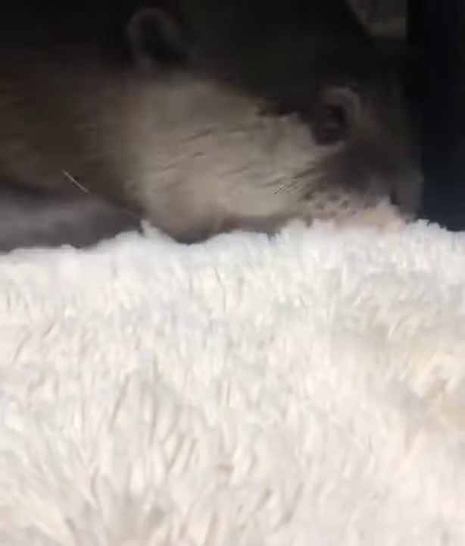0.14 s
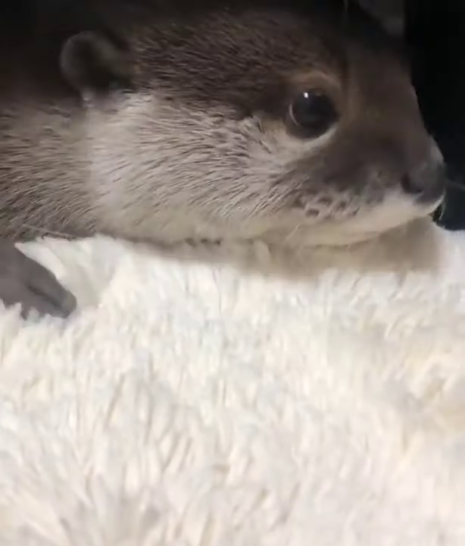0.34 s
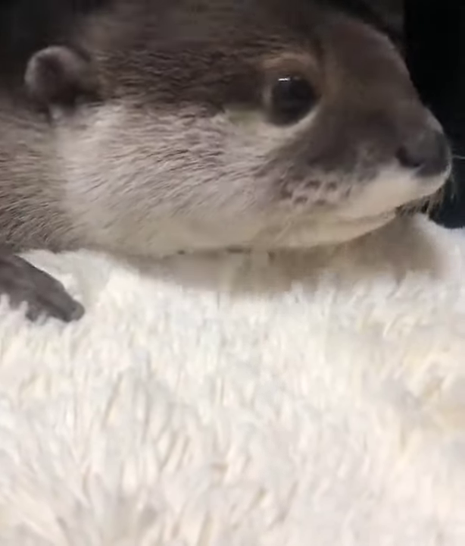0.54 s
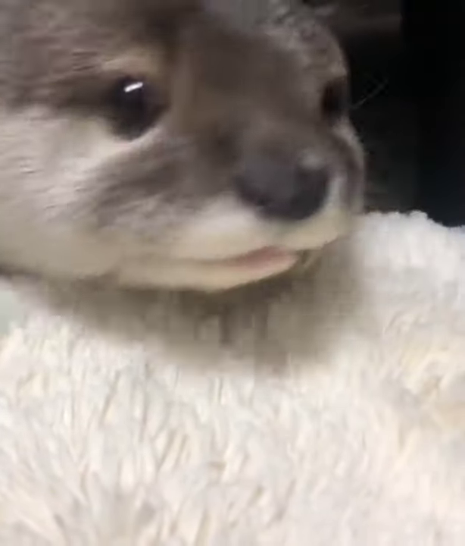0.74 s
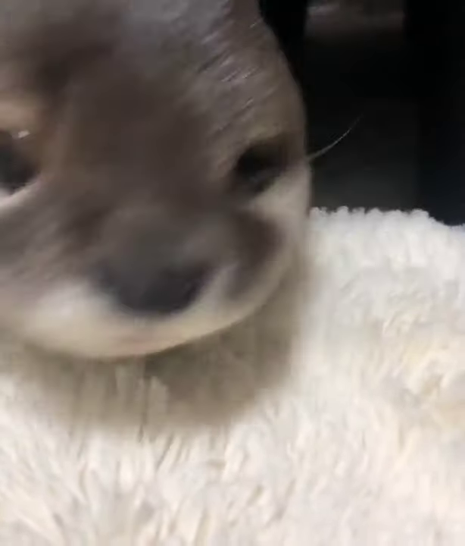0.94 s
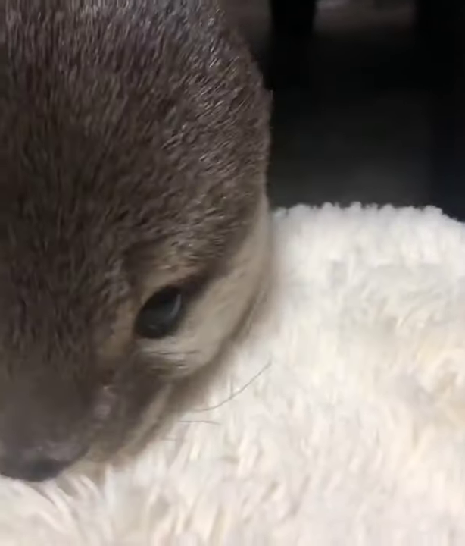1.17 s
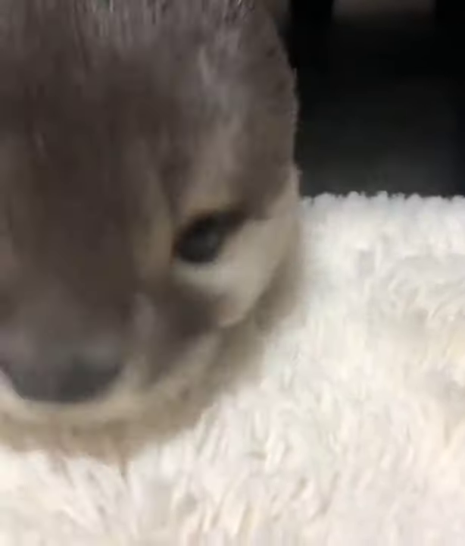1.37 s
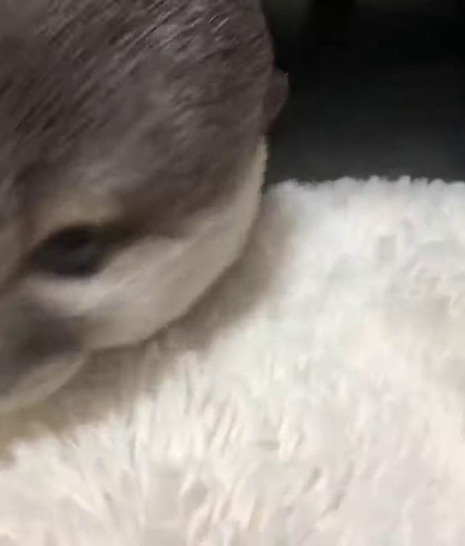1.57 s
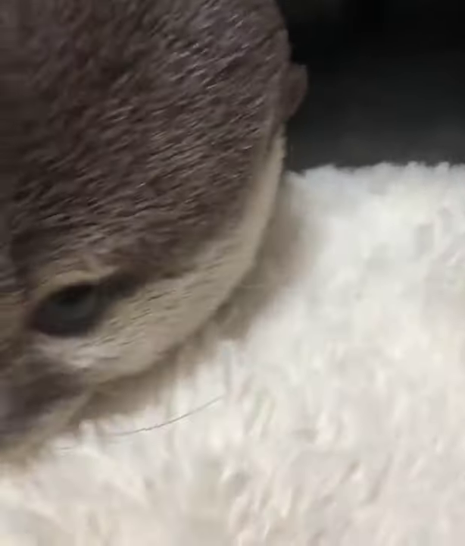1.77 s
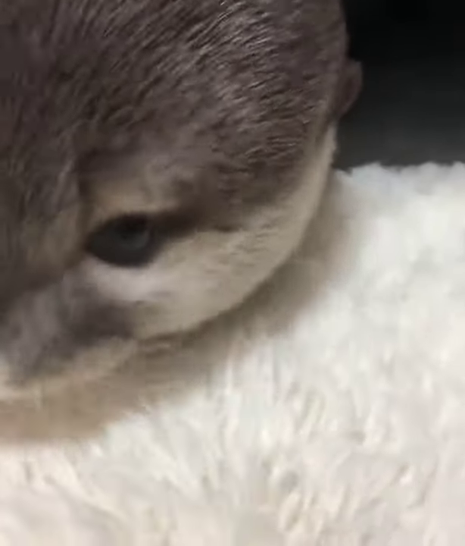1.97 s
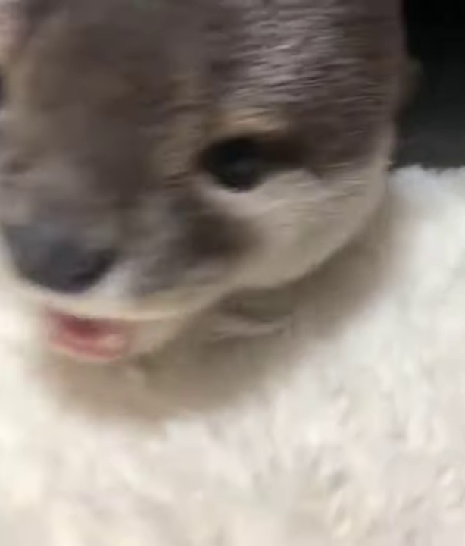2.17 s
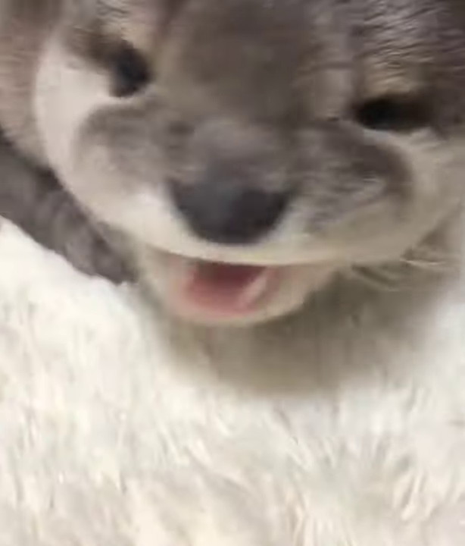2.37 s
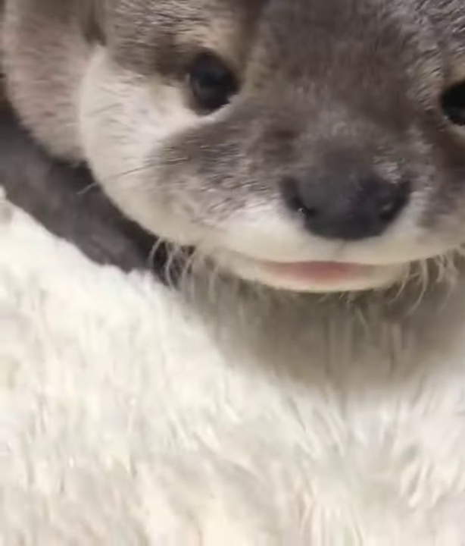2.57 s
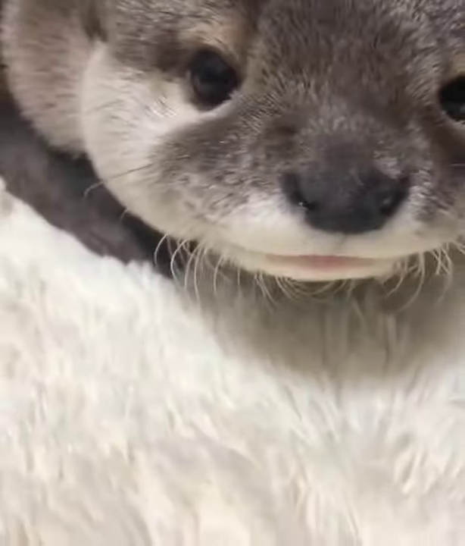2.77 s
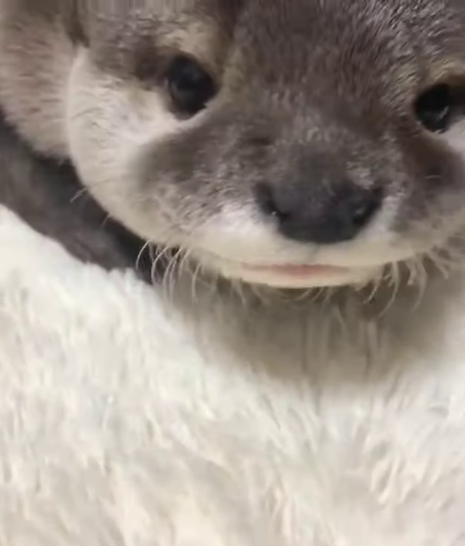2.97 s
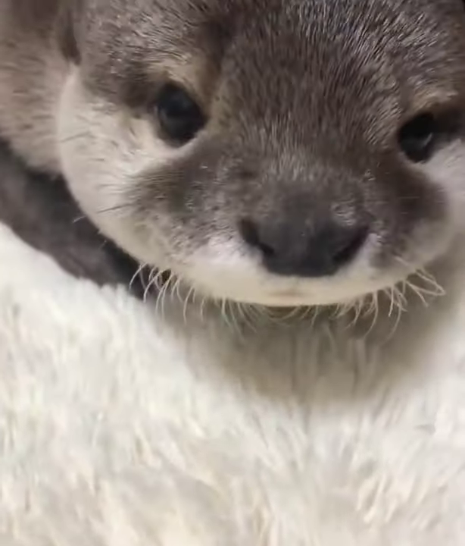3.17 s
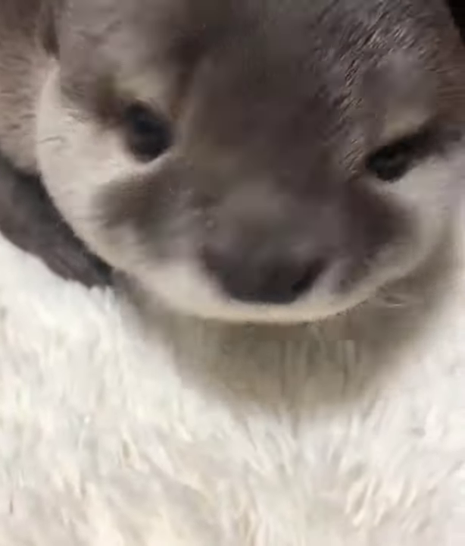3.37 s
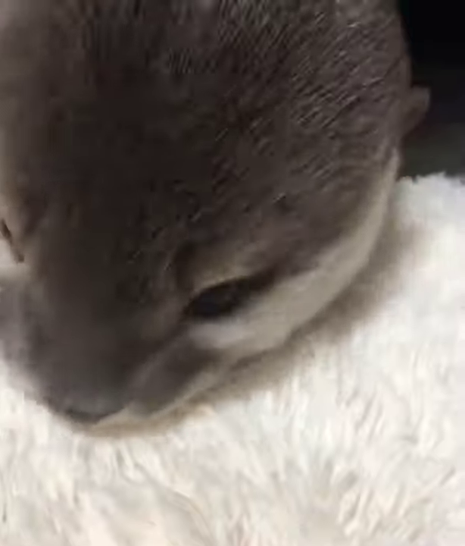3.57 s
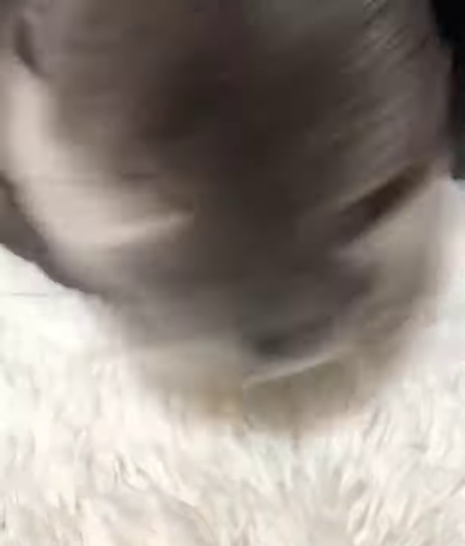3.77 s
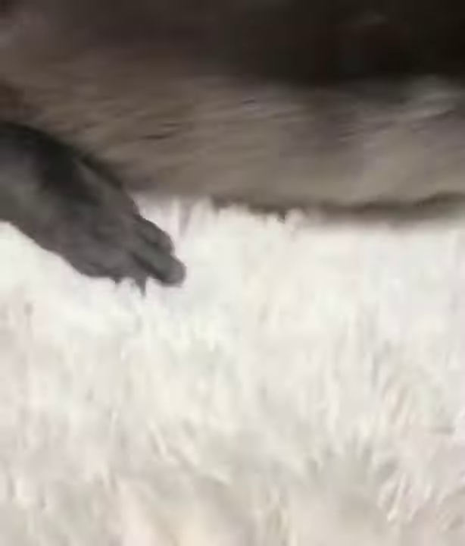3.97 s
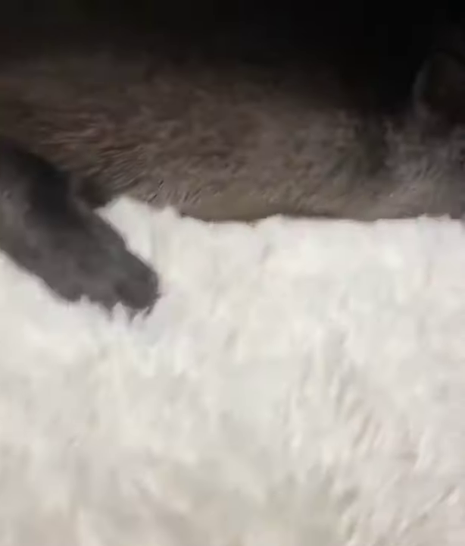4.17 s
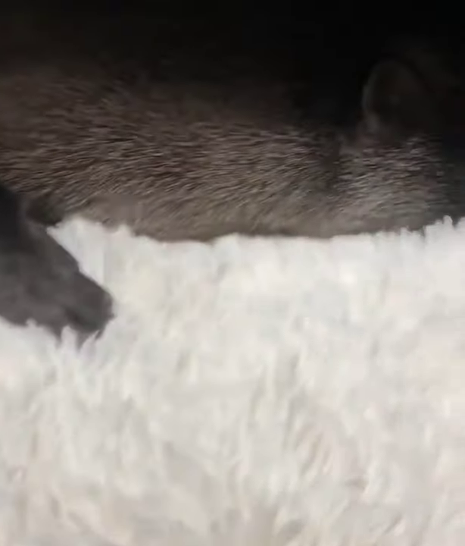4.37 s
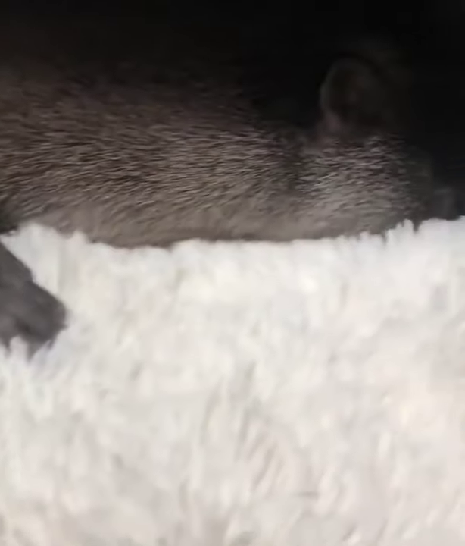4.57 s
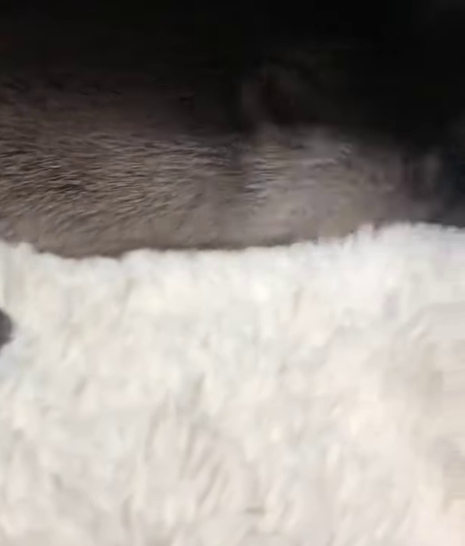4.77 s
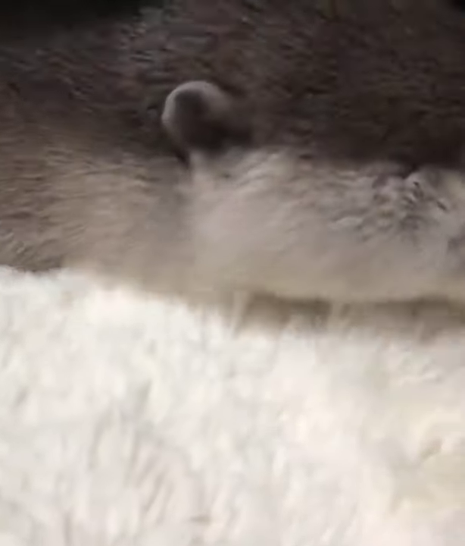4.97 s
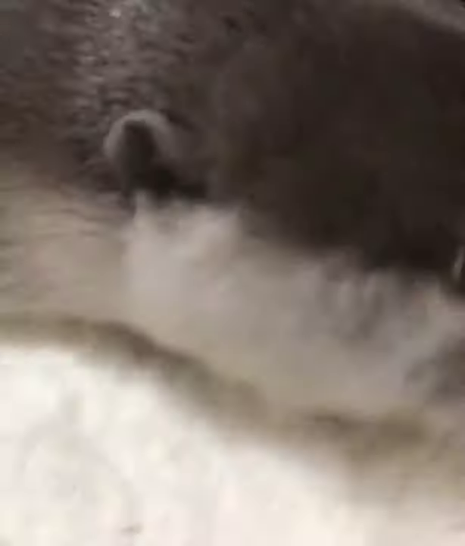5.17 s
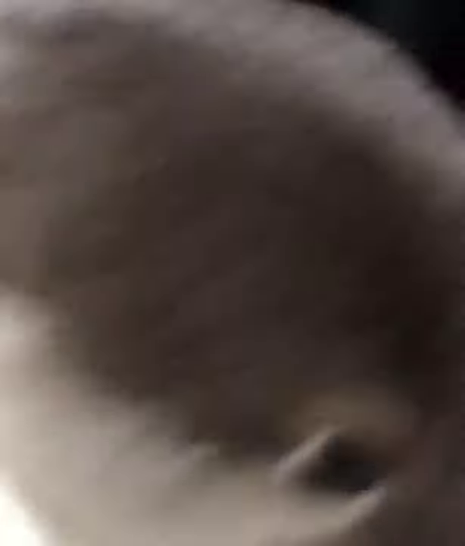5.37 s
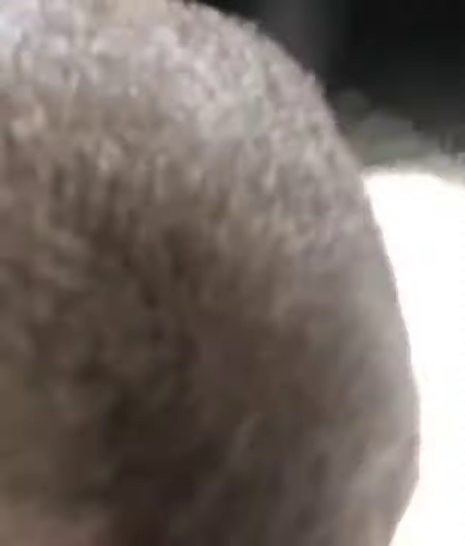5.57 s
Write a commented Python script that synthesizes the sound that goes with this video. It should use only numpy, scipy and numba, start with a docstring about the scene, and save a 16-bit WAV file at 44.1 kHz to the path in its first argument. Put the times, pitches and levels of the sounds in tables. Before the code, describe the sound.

An otter close to the microphone gives five whining, cat-like mews, some long and wavering, some short, in a quiet, soft-furnished room.

```python
"""An otter lies on a blanket right in front of the microphone in a quiet, well-damped room and mews five times.
Its vocal folds lead in with a squeak or a rasp and settle into a wavering whine; most mews close with a soft,
dull hum. The pulses of the folds ring in a mouth whose resonances move with jaw, lips and tongue.
Spent air hisses out in three puffs, and faint gliding calls come from far across the room.
Filtered noise makes the hush of the room, and decaying noise its echoes."""
import sys
import numpy as np
from scipy import signal
from scipy.fft import rfft, irfft
from scipy.io import wavfile
from scipy.ndimage import uniform_filter1d
from numba import njit

SR = 44100
rng = np.random.default_rng(int(sys.argv[2]) if len(sys.argv) > 2 else 0)


def digitize_waveform(pressure):
    """Quantize a signal to 16-bit integers and store it at the path in sys.argv[1].

    Rows of a 2-D input are taken as channels; values are limited to [-1, 1].
    """
    field = np.atleast_2d(pressure).T
    bounded = np.clip(field, -1, 1)
    quanta = np.round(bounded * 32767).astype(np.int16)
    wavfile.write(sys.argv[1], SR, quanta)


N = 248283
TIME = np.arange(N) / SR
CLEAR_ROUGHNESS = 0.024  # roughness left in a clear voice
ATTACK_S = 0.005  # of a mew and of the trill


def from_db(db):
    """Decibels to gain."""
    return np.exp(np.asarray(db) * (np.log(10) / 20))


def rms_one(x):
    """Scale to unit power."""
    return x / np.sqrt(np.mean(x ** 2) + 1e-20)


def evened(x, size=353):
    """Hold the power steady over a few cycles."""
    power = uniform_filter1d(uniform_filter1d(x * x, size), size)
    return x / np.sqrt(np.abs(power) + 1e-12)


def in_time(rows):
    """Each column of a curve, joined by straight lines."""
    s, *columns = np.transpose(rows)
    return [np.interp(TIME, s, c) for c in columns]


def gate(start, end, attack_s, release_s):
    """Rise, hold and fall between two moments."""
    rise = np.clip((TIME - start) / attack_s, 0, 1)
    fall = np.clip((end - TIME) / release_s, 0, 1)
    return (rise * fall) ** 2


def wander(rate_hz):
    """Random motion up to the given rate; spread 1."""
    lowpass = signal.butter(4, rate_hz, fs=SR, output="sos")
    return rms_one(signal.sosfilt(lowpass, rng.standard_normal(N)))


def coloured(x, spectrum):
    """Causal (minimum-phase) filter with the given spectrum."""
    size = 4096
    hz, db = np.transpose(spectrum)
    bins_hz = np.arange(size // 2 + 1) * SR / size
    gain = from_db(np.interp(np.log(bins_hz + 1), np.log(hz), db))
    # folding the cepstrum onto positive time gives minimum phase
    cepstrum = irfft(np.log(gain))
    cepstrum[1:size // 2] *= 2
    cepstrum[size // 2 + 1:] = 0
    impulse = irfft(np.exp(rfft(cepstrum)))
    return signal.fftconvolve(x, impulse)[:len(x)]


@njit
def resonate(x, angle, r):
    """Two-pole band-pass with a moving centre, gain 1 on top."""
    y = np.zeros(len(x))
    for i in range(2, len(x)):
        drive = (1 - r * r) / 2 * (x[i] - x[i - 2])
        y[i] = drive + (1 + r * r) * np.cos(angle[i]) * y[i - 1] - r * r * y[i - 2]
    return y


def lifted(x, hz, width_hz, lift_db):
    """Add the ring of one resonance to a sound."""
    angle = 2 * np.pi * hz / SR * np.ones(N)
    return x + (from_db(lift_db) - 1) * resonate(x, angle, np.exp(-np.pi * width_hz / SR))


def room_hush():
    """Still air of the room: steady noise, strongest in the bass."""
    # spectrum of the still air: (f/Hz, relative density/dB)
    floor_colour = [(25, -19), (45, -12.5), (70, 1), (130, 0.5), (330, -2), (600, -9), (1000, -13.5),
                    (1700, -10), (2300, -21.5), (3200, -17.5), (4500, -23.5), (8000, -40), (14000, -27)]
    level_db = -64.5
    return from_db(level_db) * rms_one(coloured(rng.standard_normal(N), floor_colour))


def roughness():
    """The folds turn irregular, chiefly as a mew starts and under strain, then clear gradually."""
    # rasps: (start t/s, end t/s, added roughness [about 0-1], clearing time t/s)
    rasps = [(0.005, 0.136, 0.69, .04), (.125, 0.182, 0.64, 0.017), (.18, 0.498, 0.08, 0.34),
             (1.355, 1.724, 0.03, 0.024), (1.384, 1.455, 1.01, .02), (1.988, 2.037, 0.32, 0.02),
             (2.02, 2.227, 0.36, 0.16), (2.15, 2.491, .085, 0.014), (2.409, 2.466, .08, .012),
             (2.557, 2.63, 0.03, .02), (2.865, 2.903, 0.01, 0.012), (3.042, 3.1, 0.12, .02),
             (3.817, 4.064, 0.3, 0.083), (4.795, 5.02, .52, .16)]
    rough = CLEAR_ROUGHNESS
    for start, end, amount, clearing_s in rasps:
        rough = rough + amount * gate(start, end, 0.012, clearing_s)  # 12 ms onset
    return rough


def quaver():
    """Factor on the pitch: a fine shiver, lurches in the rasps and one short, fast trill."""
    # trill at the height of the longest mew: (start t/s, end t/s, rate f/Hz, depth [share of the pitch])
    trill_setting = (2.34, 2.455, 43, 0.032)
    start, end, rate_hz, depth = trill_setting
    trill = depth * gate(start, end, ATTACK_S, ATTACK_S) * np.sin(2 * np.pi * rate_hz * (TIME - start))
    lurch = 0.031 * np.sqrt(np.abs(roughness() - CLEAR_ROUGHNESS)) * wander(70)  # share of the pitch, Hz
    shiver = 0.003 * wander(110)  # share of the pitch, Hz
    return 1 + shiver + lurch + trill


def folds(pitch, brightness, partials=22):
    """Pulses of the vocal folds; when rough they come early or late, weak or strong."""
    # hiss of air through the folds: (f/Hz, level/dB)
    air_colour = [(250, -14), (700, -32), (1650, -32), (2400, -4), (3200, -5), (4100, -11), (5600, 4),
                  (7000, 5), (9000, 3), (13000, -1)]
    jitter, doubling = 0.031, 0.078  # timing slips in cycles x 2 pi (radians), at full roughness
    flutter = 0.11  # phase shake of the first partial at full roughness (radians)
    shimmer, thump = 0.82, 0.23  # how far the gulps move the strength and add to the sound
    patchy_db, tremor, glide_s, air_db = 3.0, 0.11, 0.00096, -6.5
    jitter, doubling = 2 * np.pi * jitter, 2 * np.pi * doubling
    # roughness comes in short patches
    rough = np.clip(roughness() * from_db(patchy_db * wander(25)), 0, 1)
    # the folds have inertia, so every turn of the pitch is rounded
    pitch = uniform_filter1d(pitch, int(glide_s * SR) + 1)
    # a rough voice also trembles
    cycles = np.cumsum(pitch * (1 + tremor * rough * wander(140))) / SR
    # timing slips at random, and at times long and short cycles alternate
    slip = jitter * wander(300) + doubling * wander(30) * np.sin(np.pi * cycles)
    phase = 2 * np.pi * cycles + rough * slip
    pulses = np.zeros(N)
    for k in range(1, partials + 1):
        # partials fade out over the 1000 Hz above a third of the sample rate
        audible = np.clip((SR / 3 + 1000 - k * pitch) / 1000, 0, 1)
        # the shape of each closure varies, so the high partials flutter on their own
        shake = flutter * rough * k * k * wander(170)
        pulses += audible * from_db(brightness * np.log2(k)) * np.cos(k * phase + shake)
    # in the harshest rasps the flow comes in uneven gulps, which also thump below the pitch
    gulps = rough ** 2 * wander(330)
    pulses = evened(pulses) * np.exp(shimmer * gulps) + thump * gulps
    # air hisses through the folds each time they open
    air = coloured(rng.standard_normal(N) * (1 + np.cos(phase)), air_colour)
    # a clear note leaks hardly any air; the leak is half open at roughness 0.14
    leak = rough ** 2 / (rough ** 2 + 0.14 ** 2)
    return pulses + from_db(air_db) * leak * air


def short_note(start, length, first_hz, middle_hz, last_hz, level_db, attack_s, bright_db):
    """A squeak or hum glides through three pitches: (gain, pitch, brightness)."""
    end = start + length
    pitch = np.interp(TIME, [start, start + length / 2, end], [first_hz, middle_hz, last_hz])
    # it dies away over the last 32 % of its length
    return from_db(level_db) * gate(start, end, attack_s, 0.32 * length), pitch, bright_db


def squeaks():
    """The folds glide quickly through a short note that leads into a mew."""
    # (start t/s, length t/s, first f/Hz, middle f/Hz, last f/Hz, level/dB, attack t/s, brightness [dB/octave])
    squeak_rows = [(0.016, 0.063, 1036, 948, 896, -44, .007, 1),
                   (1.366, 0.044, 1016, 952.5, 921, -26, .006, -1.5),
                   (1.961, 0.046, 1098, 1997, 2101, -23, 0.019, -6),
                   (1.992, 0.031, 1249, 1086, 929, -27, 0.0039, -1.5),
                   (3.806, .014, 3537, 2925, 2097, -12, 0.0071, -4.5),
                   (3.812, 0.04, 1787, 1238, 980, -20, 0.0043, 0),
                   (4.802, 0.018, 1551, 1430, 1247, -37, 0.0036, -24)]
    return [short_note(*row) for row in squeak_rows]


def phrasing(jaw):
    """One throat makes all notes, so the strongest sets pitch and brightness: (gain, pitch, brightness)."""
    notes = [*squeaks(), *mews(jaw), *hums()]
    power, pitch, brightness = 0, 0, 0
    for gain, note_pitch, note_brightness in notes:
        weight = gain ** 2 + 1e-16
        power = power + weight
        pitch = pitch + weight * note_pitch
        brightness = brightness + weight * note_brightness
    return np.sqrt(power), pitch / power, brightness / power


def otter():
    """Fold pulses ring in the moving mouth and the nose, and swell with the call."""
    # shape of the mouth: (t/s, jaw opening [0-1], lip rounding [0-1], tongue [back -1 to front 1])
    mouth = [(.05, 0.17, 0.56, -.7), (.2, 0.48, 0, .3), (.34, 0.14, 0, .05), (.45, 0.28, 0.06, -.4),
             (.68, 0.61, 0.35, -.35), (1.08, 0.39, 0.15, .2), (1.4, 0.08, 0, .1), (1.7, 0.05, 0.24, .1),
             (2.08, 0.12, 0, .05), (2.25, 0.6, 0.3, .6), (2.46, 1, 0.29, .05), (2.55, 0.84, 0.8, -.2),
             (2.66, 0.6, 0.72, 0.5), (3.05, 0.43, 0.6, .25), (3.82, 0.1, 0.13, .1), (3.94, 0.21, 0.25, -.5),
             (4.88, 0, 0.02, 0.94), (5.02, .03, 0.25, 0.04), (5.28, 0.22, 0.47, -.35), (5.6, 0.17, 0, 0)]
    # resonances of the mouth: (f/Hz at rest, shift by open jaw [octaves], by rounded lips [octaves],
    # by forward tongue [octaves], width f/Hz, lift level/dB with jaw shut, added level/dB at full jaw)
    resonances = [(2365, 0.57, -0.52, 0.42, 605, 15.5, -3.5), (2595, 0.73, 0.24, .01, 670, 11, 6.5),
                  (6970, .03, -0.66, 0.011, 900, 10, -2.5), (5470, 0.92, -0.5, .01, 1100, 4.5, 8.5)]
    # narrow fixed resonances of the nose: (f/Hz, width f/Hz, lift level/dB)
    nose = [(3650, 220, 4), (4600, 220, 5), (5850, 250, 3), (7650, 300, 5)]
    # fixed colour of throat and muzzle: (f/Hz, level/dB)
    throat = [(200, -14), (450, -5), (650, 0), (950, 2), (1400, -2), (2000, 2), (3000, -7), (4200, -13),
              (6000, -11), (7800, -17), (9700, -24), (11400, -16), (12400, -28), (13800, -24)]
    jaw, lips, tongue = in_time(mouth)
    swell, pitch, brightness = phrasing(jaw)
    voice = folds(pitch * quaver(), brightness)
    for rest_hz, jaw_oct, lip_oct, tongue_oct, width_hz, lift_db, open_db in resonances:
        # the mouth is never quite still
        drift = 0.075 * wander(14)  # octaves, Hz
        octaves = jaw_oct * jaw + lip_oct * lips + tongue_oct * tongue + drift
        voice = lifted(voice, rest_hz * 2 ** octaves, width_hz, lift_db + open_db * jaw)
    for hz, width_hz, lift_db in nose:
        voice = lifted(voice, hz, width_hz, lift_db)
    return evened(coloured(voice, throat)) * swell


def room(x, t60, echo_db):
    """A diffuse, decaying tail that starts 6 ms on, once sound is back from the nearest walls."""
    # colour of the room's echo: (f/Hz, level/dB)
    walls = [(300, -1), (800, -3.5), (2500, -1.5), (6000, 3), (13000, -6)]
    t = TIME[:SR // 2]
    tail = coloured(rng.standard_normal(len(t)), walls) * from_db(-60 * t / t60) * (t > 0.006)
    tail = tail / np.sqrt(np.sum(tail ** 2))
    return from_db(echo_db) * signal.fftconvolve(x, tail)[:N]


def mews(jaw):
    """Each mew moves towards its full level, wavers and is brightest midway: (gain, pitch, brightness)."""
    # the five mews: (start t/s, end t/s, release t/s, starting level/dB, full level/dB, swell time t/s,
    # fade [dB/s, negative grows], base brightness [dB/octave], waver [share of the pitch],
    # push [dB gained per octave that the pitch lifts above its running mean])
    mew_rows = [(0.089, 1.096, 0.015, -42.5, -13.5, 0.32, -1, -0.48, .009, 16),
                (1.396, 1.709, 0.016, -34.5, -14.5, 0.08, 14.5, -2.5, .007, 19.5),
                (1.988, 3.105, 0.044, -42, -11, 0.11, 6, -0.8, .003, 9),
                (3.866, 4.13, 0.051, -26, -31.5, 0.036, 18, -3, .006, -13.5),
                (4.803, 5.683, .016, -49.5, -15, .18, -1, 0.5, .003, 19)]
    # the tune of each mew: (t/s, pitch f/Hz)
    tune_1 = [(0.1, 980), (0.138, 810), (0.152, 947), (0.184, 925), (0.25, 765), (0.284, 791), (0.316, 730),
              (0.334, 810), (0.364, 730), (0.386, 830), (0.428, 708), (0.454, 771), (0.508, 696),
              (0.53, 788), (0.584, 742), (0.678, 782), (0.89, 756.5), (0.896, 717), (1.036, 740.7),
              (1.09, 746)]
    tune_2 = [(1.44, 870), (1.458, 860), (1.51, 836), (1.56, 863), (1.634, 760), (1.648, 804), (1.7, 749)]
    tune_3 = [(2.03, 910), (2.108, 847), (2.202, 829), (2.22, 760), (2.258, 861), (2.272, 787),
              (2.298, 801), (2.324, 657), (2.344, 786), (2.388, 673), (2.418, 784), (2.448, 702),
              (2.458, 848), (2.496, 896), (2.546, 846), (2.59, 702), (2.606, 750), (2.69, 746),
              (2.874, 656), (2.9, 690), (3.058, 640), (3.08, 652)]
    tune_4 = [(3.875, 1322), (3.881, 1310), (3.895, 1109), (3.935, 1127), (3.967, 838), (4.015, 808),
              (4.029, 742), (4.1, 784)]
    tune_5 = [(4.83, 966), (4.844, 1070), (4.89, 1077), (4.904, 964), (4.924, 925), (4.976, 909),
              (5.032, 962), (5.1, 899), (5.22, 954), (5.248, 931), (5.286, 1001), (5.37, 931), (5.408, 935),
              (5.446, 996), (5.548, 945), (5.62, 949)]
    waver_hz, push_span_s = 39, 0.18
    mid_bright_db, jaw_bright_db = 3.5, 1.5  # dB per octave added midway and at full jaw
    for row, tune in zip(mew_rows, [tune_1, tune_2, tune_3, tune_4, tune_5]):
        start, end, release_s, start_db, full_db, swell_s, fade_db, bright_db, waver, push_db = row
        age = np.clip(TIME - start, 0, end - start)
        pitch = in_time(tune)[0] * (1 + waver * wander(waver_hz))
        lift = np.log2(pitch / uniform_filter1d(pitch, int(push_span_s * SR)))
        swell_db = full_db + (start_db - full_db) * np.exp(-age / swell_s)
        level_db = swell_db - fade_db * age + push_db * lift
        midway = np.sin(np.pi * age / (end - start))
        brightness = bright_db + mid_bright_db * midway + jaw_bright_db * jaw
        yield from_db(level_db) * gate(start, end, ATTACK_S, release_s), pitch, brightness


def puffs():
    """The otter lets out its last air after a call: soft hisses that fade as the air runs out."""
    # (start t/s, length t/s, level/dB)
    puff_rows = [(1.079, 0.044, -34.5), (3.08, 0.13, -46.5), (4.086, 0.13, -53)]
    # colour of that air: (f/Hz, level/dB)
    puff_colour = [(60, -22.5), (300, -8.5), (1000, -4.5), (3000, -6.5), (5500, -5), (8000, -26),
                   (13000, -23)]
    flow = np.zeros(N)
    for start, length, level_db in puff_rows:
        shape = np.interp(TIME, [start, start + 0.0031, start + length], [0, 1, 0])
        flow += from_db(level_db) * shape ** 2
    return flow * rms_one(coloured(rng.standard_normal(N), puff_colour))


def hums():
    """Soft, dull notes with hardly any overtones from the folds, mostly closing a mew."""
    # (start t/s, length t/s, first f/Hz, middle f/Hz, last f/Hz, level/dB, attack t/s)
    hum_rows = [(1.087, .02, 737.2, 755, 790, -28.5, 0.007), (1.694, .019, 778.2, 773, 832, -26, 0.0067),
                (3.078, .032, 666, 677.5, 652, -32, 0.0069), (4.091, .039, 769.2, 818, 786, -36.5, .01),
                (4.473, .052, 918.6, 878, 685, -39, .014)]
    return [short_note(*row, bright_db=-25) for row in hum_rows]  # dB per octave


def far_mews(partials=5):
    """Short gliding calls from far across the room, dulled by distance."""
    # (start t/s, length t/s, start pitch f/Hz, end pitch f/Hz, level/dB of each partial before colour and mix)
    far_rows = [(3.479, 0.087, 1300, 1482, -66.5), (3.597, 0.053, 912, 882, -65),
                (4.167, 0.1066, 742, 703, -67), (4.519, 0.069, 1170, 1250, -66.5)]
    # their colour: (f/Hz, level/dB)
    far_colour = [(800, 0.5), (1600, -0.5), (3300, -4), (4500, -18), (8000, -27)]
    out = np.zeros(N)
    for start, length, from_hz, to_hz, level_db in far_rows:
        along = np.clip((TIME - start) / length, 0, 1)
        phase = 2 * np.pi * np.cumsum(from_hz + (to_hz - from_hz) * along) / SR
        tone = sum(np.cos(k * phase) for k in range(1, partials + 1))
        out += from_db(level_db) * np.sin(np.pi * along) * tone
    return coloured(out, far_colour)


def scene():
    """The close otter, far calls, their echo and the room's hush, alike in both channels."""
    hush = room_hush()
    voice = otter() + puffs()
    far = far_mews()
    # the close voice returns off the nearby surfaces and from the whole room
    near_echo = room(voice, t60=0.018, echo_db=-19.5)
    room_echo = room(voice, t60=0.16, echo_db=-30.5)
    far_echo = room(far, t60=0.266, echo_db=-2.0)
    mix = voice + near_echo + room_echo + far_echo + from_db(-3) * far + hush
    return np.tile(mix, (2, 1))


def record(dry):
    """The top is cut steeply above 14.1 kHz."""
    return signal.sosfilt(signal.ellip(12, 0.1, 80, 14100, fs=SR, output="sos"), dry)


dry = scene()
out = record(dry)
digitize_waveform(out)
```